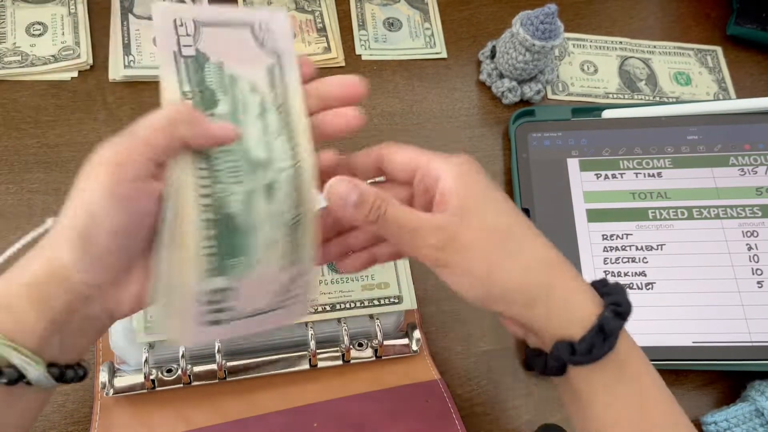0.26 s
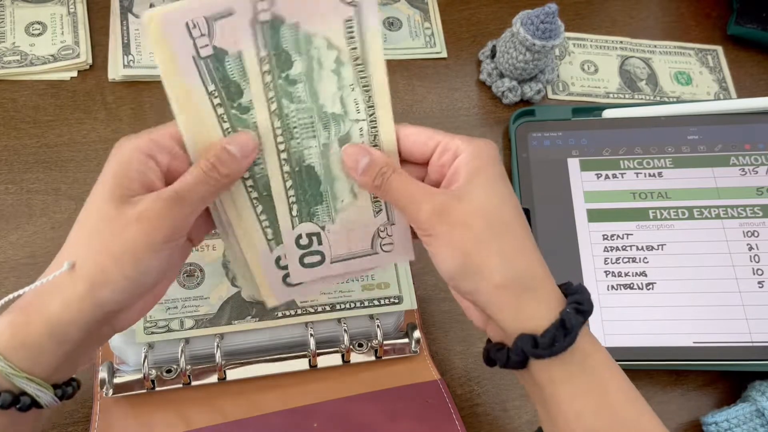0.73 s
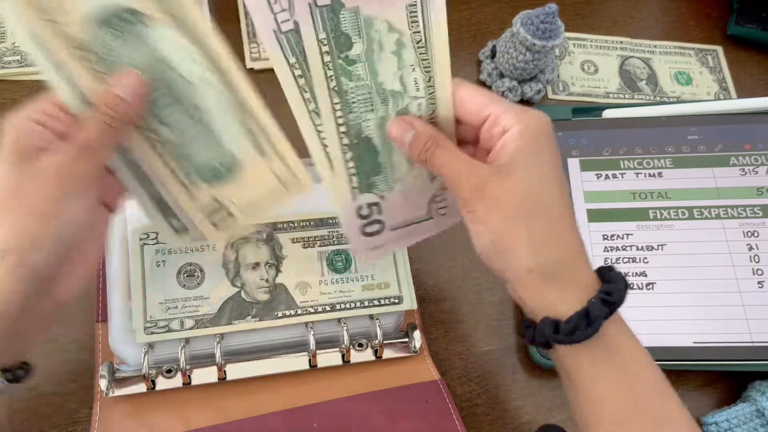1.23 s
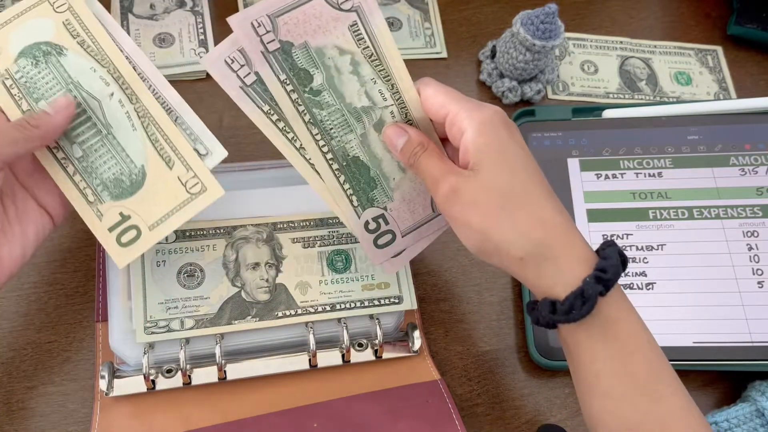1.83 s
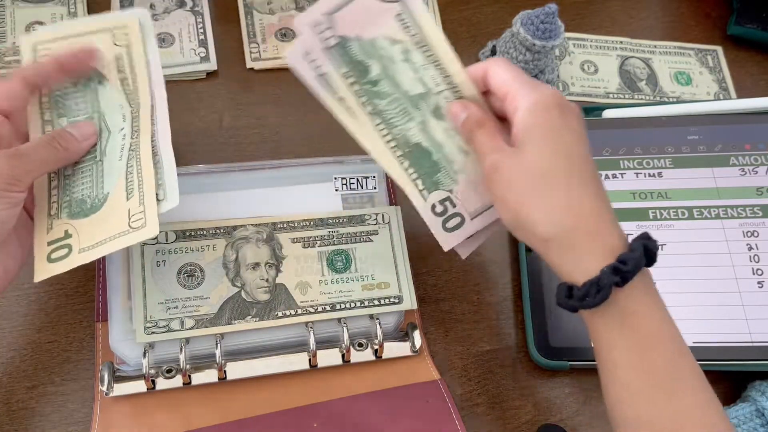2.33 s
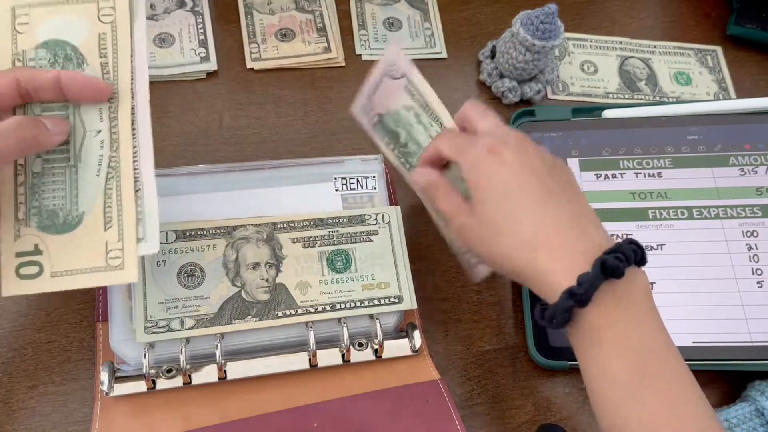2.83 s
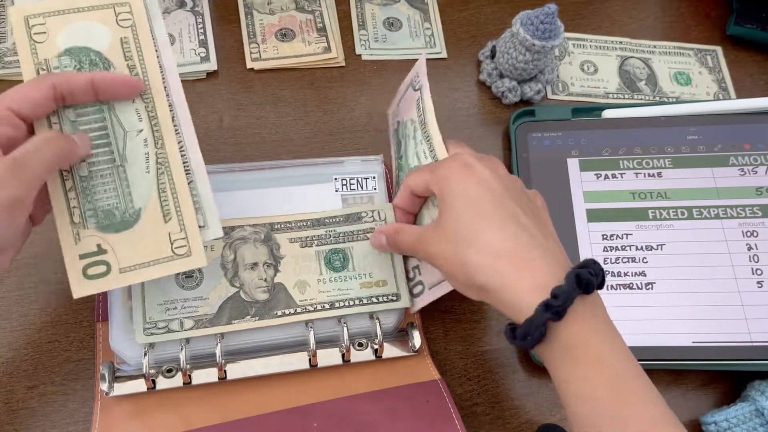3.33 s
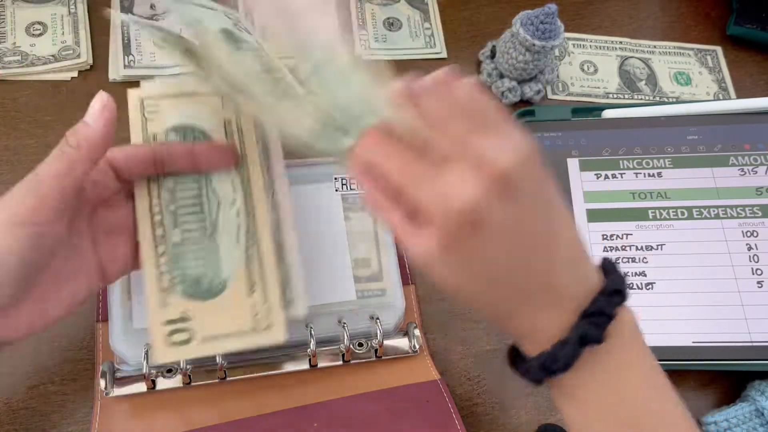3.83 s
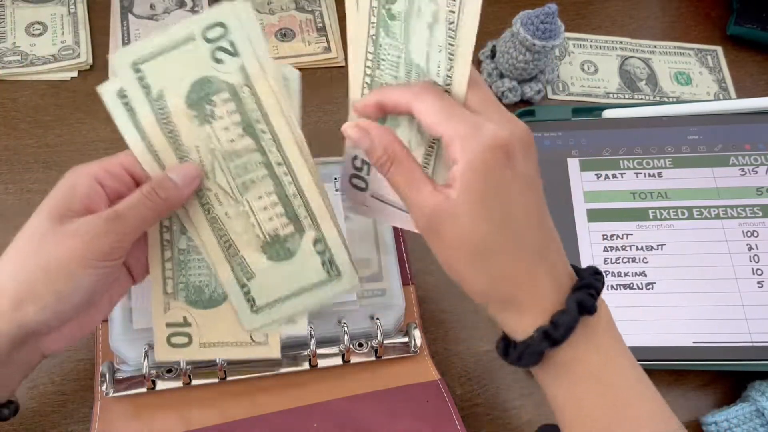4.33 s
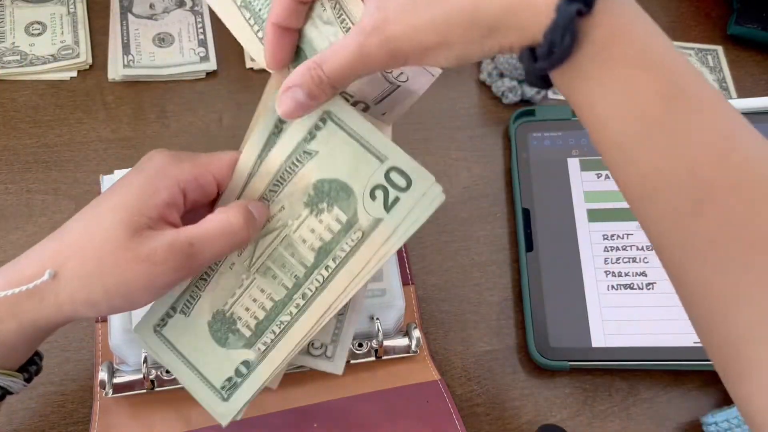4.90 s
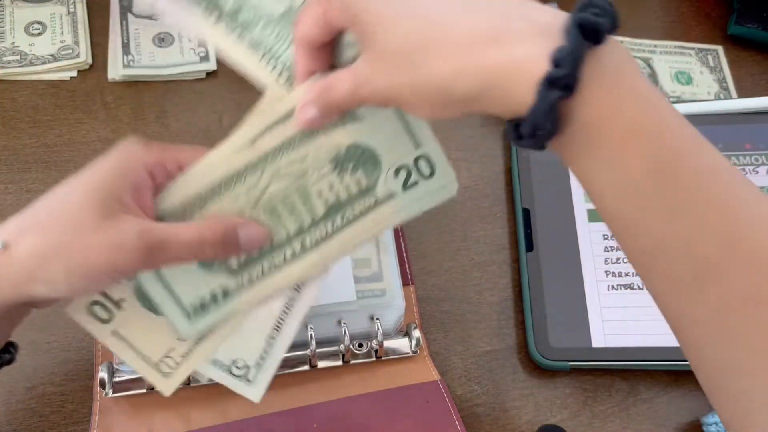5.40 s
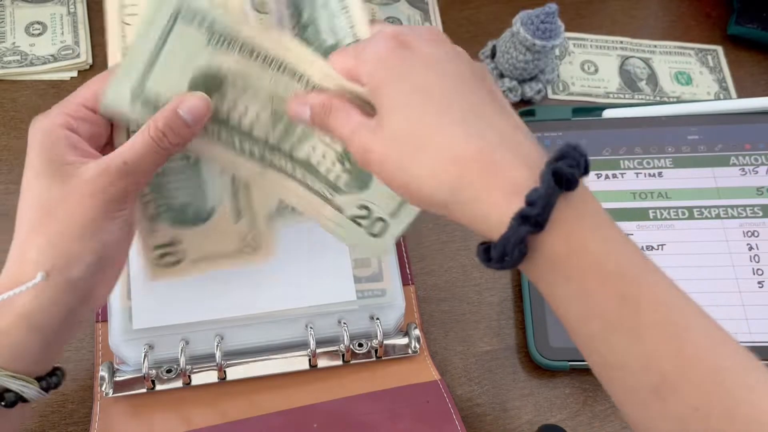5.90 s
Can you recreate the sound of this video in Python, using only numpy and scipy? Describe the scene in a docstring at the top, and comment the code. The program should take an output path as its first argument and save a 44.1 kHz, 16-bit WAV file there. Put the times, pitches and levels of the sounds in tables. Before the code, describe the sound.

Paper banknotes rustle, slide and snap softly as they are handled up close, over a steady low hum indoors.

```python
"""Banknotes over a desk

Hands fan, slide and flick paper banknotes close under the microphone, heard with a fixed stereo spread.
The sheets rub in tiny slips and buckle in short snaps; fingers now and then knock the desk.
Farther off in the room a compressor motor hums, its second order beating against the mains buzz."""
import sys
import numpy as np
from scipy import signal
from scipy.fft import rfft, irfft, next_fast_len
from scipy.io import wavfile
from scipy.ndimage import uniform_filter1d, map_coordinates

SR = 44100
rng = np.random.default_rng(int(sys.argv[2]) if len(sys.argv) > 2 else 0)


def file_out(sig):
    """Save sig as 16-bit WAV at sys.argv[1]."""
    # one column per channel
    cols = np.atleast_2d(sig).T
    # limit, then scale
    lim = np.clip(cols, -1, 1)
    pcm = np.round(lim * 32767).astype(np.int16)
    wavfile.write(sys.argv[1], SR, pcm)


N = 271195

# The paper's four bands: flap of the whole sheet, ring of the cupped stack, rub or crackle, fibre fizz
# (low edge [Hz], high edge [Hz], gain [dB])
PAPER_BANDS = [(334, 1470, -1), (1865, 2644, -1), (3140, 7100, 0), (7250, 20500, 2)]


def amp(db):
    """Decibels to gain."""
    return 10 ** (np.asarray(db) / 20)


def unit(x):
    """Scaled to rms 1."""
    return x / np.sqrt(np.mean(x ** 2) + 1e-20)


def along(points, hz):
    """Interpolate (frequency [Hz], value) points on a log frequency axis."""
    point_hz, values = np.transpose(points)
    return np.interp(np.log(hz + 1), np.log(point_hz + 1), values)


def wobble(rate):
    """A smooth random curve, rate knots a second."""
    knots = rng.standard_normal(int(N * rate / SR) + 4)
    return map_coordinates(knots, [np.arange(N) * rate / SR])


def filtered(x, response):
    """Filter x by a complex response, a function of frequency in Hz."""
    size = next_fast_len(N + SR // 2)
    return irfft(rfft(x, size) * response(np.fft.rfftfreq(size, 1 / SR)), size)[..., :N]


def room_tone():
    """The low rush of the room, wavering slightly in level."""
    # Spectrum of the room's noise (frequency [Hz], relative level [dB])
    spectrum = [(25, -19), (45, -2), (62, 5), (85, -4), (103, 1.5), (150, -9), (200, -8.5), (355, -10),
                (400, -15.5), (1000, -29.5), (2200, -37.5), (3500, -48), (8000, -61.5), (15000, -46.5)]
    rush = filtered(rng.standard_normal((2, N)), lambda hz: amp(along(spectrum, hz)))
    return amp(-48.5 + 1.5 * wobble(4.13)) * unit(rush)


def compressor_hum():
    """Shaft orders and mains buzz across the room, each a little unsteady; the first order swells."""
    # Upper orders of the motor (multiple of the shaft rate, level [dB])
    orders = [(2, -51), (3, -74.5), (4, -60.5), (5, -62.5)]
    # Mains buzz (multiple of the buzz frequency, level [dB])
    harmonics = [(1, -46.5), (2, -81.5), (3, -69)]
    shaft_hz, buzz_hz = 58.435, 119.943
    in_phase_s, rise_s = 0.258, 1.285
    t = np.arange(N) / SR

    def tone(hz, db, sway_db):
        rms = amp(db + sway_db * wobble(2.77))
        return np.sqrt(2) * rms * np.cos(2 * np.pi * hz * (t - in_phase_s))

    swell_db = -35 - 36 * np.exp(-t / rise_s)
    shaft = tone(shaft_hz, swell_db, sway_db=0.5)
    shaft += sum(tone(k * shaft_hz, db, sway_db=1.67) for k, db in orders)
    return shaft + sum(tone(k * buzz_hz, db, sway_db=1.0) for k, db in harmonics)


def sliding():
    """Power of the rubbing in each paper band: resting contact plus every stroke."""
    # Notes resting against each other in moving hands (time [s], rub [dB], flap [dB re rub])
    contact = [(0.0, -64.5, -19), (0.27, -64, -6), (0.47, -65, -3), (0.78, -65.5, -0.5), (0.96, -70, 1.5),
               (1.2, -68.5, 0.5), (1.35, -70.5, -2), (1.49, -79, -4), (1.6, -93, 25), (1.8, -79, 9),
               (2.0, -79.5, 2), (2.74, -87, 8), (2.83, -70.5, 15), (3.34, -72, 7.5), (3.5, -64, 2),
               (3.7, -71, -7), (3.82, -76, 12), (3.88, -76, 3), (4.13, -69.5, -11), (4.22, -102, 13),
               (4.3, -70.5, -20), (4.42, -70, -1), (4.79, -70, 7), (4.87, -63.5, 2), (5.42, -56.5, -9),
               (5.55, -63.5, 2.5), (5.85, -58, 3), (6.0, -64, -9)]
    # One sheet drawn across another (start [s], length [s], rub at the end [dB],
    # swell on the way [dB], flap [dB re rub], cup [dB re rub], fizz [dB re rub])
    strokes = [(0.114, 0.019, -51.5, 1.5, -3.5, -2, -10), (0.184, 0.027, -52.5, -4, -7.5, -11, -5),
               (0.316, .05, -56.5, 7.5, 5, -1.5, 2), (0.414, .022, -59.5, 0.1, -0.5, -14, 4),
               (0.507, 0.037, -60.5, 3.5, -19, -12, 1.5), (0.631, 0.022, -59.5, 0.1, 5, -3, 1),
               (0.76, 0.043, -65.5, 1, 1.5, -8, 3.5), (1.034, 0.079, -56.5, -1.8, -5, -7, 0.7),
               (1.122, 0.036, -61, -3.5, -7, -5, 4.5), (1.986, .07, -71.5, 4.5, 4, -1.5, 3),
               (2.161, 0.059, -65.5, 8, -3, 1.5, 1), (2.327, 0.18, -74.5, -6.5, 1, 0, 2.5),
               (2.595, 0.14, -76, -8, 3, -0.5, 0.5), (2.804, 0.028, -56.5, -1, 4, 0, -1),
               (2.952, 0.015, -58.5, 2, 3, 10.5, -3), (3.028, 0.054, -55.5, 4, -1, 3, -2),
               (3.155, 0.019, -61.5, -4, 3, 4, -1.5), (3.384, 0.089, -52.5, 5, 4, 2.5, -9),
               (3.613, 0.063, -55, 2.5, -6, -9, 2.5), (3.855, 0.049, -61.5, 4, -1.5, 1, 0.5),
               (3.946, 0.14, -55, 7.5, 0.9, -1.5, -4), (4.41, 0.096, -64, -1, 3, 6, 2.5),
               (4.542, 0.034, -55, 3, 1, 4.5, 1), (4.641, 0.032, -58.5, -0.5, 3, 4.5, -1.5),
               (4.737, 0.031, -56, 3.5, 1.2, 3.5, -15), (4.819, 0.039, -49, 0, -6, -0.5, -6),
               (4.865, 0.052, -49, 5, -4, -1, -7), (4.956, 0.022, -45.5, 5, 3.5, 0, -14),
               (5.013, 0.076, -50.5, -3, -8, -6, -13), (5.115, 0.2174, -42.5, 10.5, -2, 3, -5),
               (5.353, 0.052, -53, 4.5, 1.5, 2.5, 0), (5.493, 0.022, -51.5, 0.5, -9, -2, 0.1),
               (5.59, 0.198, -55, -1, -16, 1, -1), (5.82, .016, -51, 0.1, -2, -9, -3.5),
               (6.019, 0.017, -55, 2.5, 0, 5, 0), (6.078, .075, -54, -8, -4, -6, -0.5)]
    attack_db_per_s, release_db_per_s = 504, 804
    t = np.arange(N) / SR
    times, *levels = np.transpose(contact)
    rub_db, flap_db = [np.interp(t, times, column) for column in levels]
    power = amp([rub_db + flap_db, rub_db - 5, rub_db, rub_db - 1]) ** 2
    for start, length, end_db, swell_db, flap_db, cup_db, fizz_db in strokes:
        span = slice(max(0, round((start - .15) * SR)), round((start + length + .15) * SR))
        age = t[span] - start
        early, late = np.maximum(-age, 0), np.maximum(age - length, 0)
        to_go = np.clip(1 - age / length, 0, 1)
        level_db = end_db - swell_db * to_go - attack_db_per_s * early - release_db_per_s * late
        power[:, span] += amp(level_db + np.c_[[flap_db, cup_db, 0, fizz_db]]) ** 2
    return power


def slips(per_s, spread_db, life_s, steady):
    """Roughness of rubbing paper: a steady share plus random slips of very unequal size."""
    hits = rng.random(N) < per_s / SR
    sizes = hits * amp(spread_db * rng.exponential(1, N).clip(0, 4))
    bursts = signal.lfilter([1], [1, -np.exp(-1 / (life_s * SR))], sizes)
    return unit(steady + unit(bursts))


def bending_noise(depth_db):
    """Two noises whose colour drifts: the bending sheet favours now one pitch, now another."""
    spectra = signal.stft(rng.standard_normal((2, N + 256)), nperseg=256)[2]
    colour = uniform_filter1d(rng.standard_normal(spectra.shape[1:]), size=3, axis=0)  # over pitch
    colour = uniform_filter1d(colour, size=14, axis=1)  # over time
    noise = signal.istft(spectra * amp(depth_db * unit(colour)), nperseg=256)[1]
    return unit(noise[:, :N])


def snaps():
    """Creases buckle: noise power and an opening crack per band, and the ring of each freed fold."""
    # Buckling creases (time [s], level [dB], pitch of the fold [Hz], flap [dB re level],
    # crackle [dB re level], nominal t60 [s])
    creases = [(0.1221, -21, 4390, -16, -10, 0.0094), (0.138, -25.5, 7800, -13.5, -4.5, 0.0062),
               (0.1417, -32, 5600, -19, 1, 0.013), (0.1475, -25.5, 5270, -26, -2.5, 0.0076),
               (0.1841, -16, 7900, -20.5, -12.5, 0.018), (0.1895, -36, 2250, -5, -26, 0.029),
               (0.2018, -34.5, 5000, -30, 1, 0.014), (0.319, -47, 4700, -3, 0.5, 0.02),
               (0.426, -44.5, 2780, -8, -13, 0.031), (0.697, -47, 1110, 6.5, -15, 0.029),
               (1.062, -30.5, 2200, -0.5, -16.5, 0.02), (1.383, -55.5, 2400, -15, -5, .016),
               (2.0705, -58, 5000, -12, 0, .012), (2.116, -54.5, 900, -16, -2.5, .045),
               (2.398, -43, 2190, -6, -16, .014), (2.443, -48.5, 2190, -8, -10, .016),
               (2.7702, -25, 2530, -7.5, -12, 0.017), (2.7759, -35.5, 1560, 0, 0.5, 0.01),
               (2.802, -38, 3860, 1, -13, .054), (2.8176, -41.5, 1520, -7, -1, 0.025),
               (2.8679, -41, 1110, 4, -10, 0.03), (2.9475, -29, 2330, -3.5, -11.5, 0.015),
               (2.9577, -38.5, 1330, -5, -11, 0.042), (3.0684, -37, 2930, -9, -17, 0.042),
               (3.077, -43, 2740, -12, -12, 0.032), (3.1296, -27, 3030, -18, -16, 0.0035),
               (3.1528, -34.5, 1420, -5, -8, 0.03), (3.1593, -31.5, 1530, -6, -18, 0.014),
               (3.166, -42, 1300, -16, -7, 0.014), (3.256, -47, 3950, -13, -11.5, .023),
               (3.3587, -41.5, 1120, -2, -2.5, 0.022), (3.419, -32.5, 2570, -1, -12, .015),
               (3.446, -32, 1220, -17, -10, 0.027), (3.466, -32, 3600, -21, -12, 0.028),
               (3.779, -46, 3570, -23, -6, 0.011), (3.8449, -44.5, 4540, -7, -5.5, 0.12),
               (3.8546, -48, 900, -6, -5, 0.011), (3.993, -43.5, 2430, -6, -9, .024),
               (4.0375, -40.5, 4940, -11, -3, 0.021), (4.0682, -48, 6700, -17, -5, .09),
               (4.4049, -34, 2130, -5, -26, 0.032), (4.4176, -39, 1520, -17, -11, 0.0088),
               (4.465, -40, 2310, -8, -15.5, 0.045), (4.504, -45, 9150, -16, -8, .012),
               (4.5742, -37, 2080, -5, -14, 0.03), (4.5813, -37, 2220, -7.5, -12, 0.03),
               (4.63, -35.5, 1970, -16, -17, 0.029), (4.7252, -40.5, 3660, -4, -7, 0.007),
               (4.9448, -42.5, 2600, -12, -3, .012), (4.9562, -27.5, 6130, -10, -9, 0.057),
               (4.9646, -29.5, 2500, -9, -6, .073), (5.0073, -29, 2960, -15, -8.5, .095),
               (5.1118, -50, 2200, -16, -9, 0.076), (5.128, -29, 1910, -21, -10, .013),
               (5.1644, -30, 2340, -23, -24, .013), (5.1869, -46, 2500, -20, -19, .026),
               (5.202, -35, 2000, -19, -4.5, .014), (5.214, -31, 2340, -9, -5.5, 0.026),
               (5.2353, -26, 7500, -11, -4.5, 0.027), (5.3336, -44.5, 1930, 3, 1, 0.023),
               (5.5018, -39.5, 2210, -17, -6.5, 0.07), (5.569, -40, 7030, -18, -11, .038),
               (5.6412, -37.5, 2460, -26, -8.5, 0.025), (5.6538, -27.5, 11850, -32, -15, .017),
               (5.678, -32, 2260, -9, -9, 0.024), (5.772, -40, 3200, -7, -13, .036),
               (5.811, -35, 3100, -15, -6.5, 0.046), (5.864, -38, 1300, -2.5, -7, .013),
               (6.012, -44.5, 3000, -11, -7, .025), (6.0243, -38, 5100, -23, -1.5, 0.025),
               (6.066, -35.5, 2200, -12, -4.5, 0.021), (6.103, -35.5, 2710, -10, -5.5, 0.041),
               (6.1172, -25, 7950, -12, -12, 0.0075)]
    cup_hz, fold_t60_s = 2040, 0.025
    power, cracks = np.zeros((2, len(PAPER_BANDS), N + SR))
    folds = np.zeros(N + SR)
    t = np.arange(SR // 8) / SR
    for start, db, hz, flap_db, crackle_db, t60 in creases:
        onset = round(start * SR)
        span = slice(onset, onset + len(t))
        octaves = np.log2(hz / cup_hz)
        cup_db = 3.5 - 7.5 * abs(octaves)  # a fold near the cupped stack's pitch rings it most
        fizz_db = -5 + 3.5 * octaves  # a higher fold fizzes more
        shares = amp([flap_db, crackle_db + cup_db, crackle_db, crackle_db + fizz_db])
        attack = 1 - np.exp(-t / (0.016 * t60))  # a slow buckle starts softly
        envelope = attack * amp(db - 60 * t / np.clip(t60, .003, .1))
        power[:, span] += (shares[:, None] * envelope) ** 2
        cracks[:, onset] = shares * amp(db - 5.5) * min(1, 0.0087 / t60)  # a quick one jerks sharply
        folds[span] += envelope * amp(-60 * t / fold_t60_s) * np.sin(2 * np.pi * hz * t)
    return power[:, :N], cracks[:, :N], folds[:N]


def banknotes():
    """Rubbing and snaps shake the same sheets; being unrelated motions, they add in power."""
    flicker = amp(1.32 * np.array([wobble(30) for _ in PAPER_BANDS]))
    roughness = slips(per_s=200, spread_db=4.5, life_s=0.0037, steady=3.0) * flicker
    snap_power, cracks, folds = snaps()
    powers = sliding() * roughness ** 2 + snap_power
    noise = bending_noise(depth_db=3)
    sound = folds * [[1], [.5]]
    for (low_hz, high_hz, db), power, crack in zip(PAPER_BANDS, powers, cracks):
        band = signal.butter(3, [low_hz, min(high_hz, SR / 2.2)], "bandpass", fs=SR, output="sos")
        makeup = np.sqrt(SR / 2 / (high_hz - low_hz))  # for what the band leaves out
        sound += amp(db) * makeup * signal.sosfilt(band, noise * np.sqrt(power) + makeup * crack)
    return sound


def desk_knocks():
    """Soft fingertips set the desk top ringing for a moment, a little differently each time."""
    # Fingers landing on the desk (time [s], strength [dB])
    knocks = [(0.182, -37), (0.701, -41.5), (1.309, -30), (1.329, -41), (2.821, -36.5), (4.96, -36.5)]
    # Modes of the desk top (frequency [Hz], relative level [dB], t60 [s])
    modes = [(53.5, -1.5, 0.21), (191, -1.5, 0.061), (249, 3.5, 0.079), (403, 0.5, 0.037), (493, -27, 0.03),
             (820, -10.5, 0.025)]
    desk = np.zeros(N + SR)
    t = np.arange(SR // 4) / SR
    attack = 1 - np.exp(-t / 0.00074)
    for start, db in knocks:
        ring = sum(amp(mode_db + rng.normal(0, 2) - 60 * t / t60) * np.sin(2 * np.pi * hz * t)
                   for hz, mode_db, t60 in modes)
        desk[round(start * SR):][:len(t)] += amp(db - 4) * ring * attack
    return desk[:N]


def room_reverb(x):
    """The room's short tail; each frequency dies at its own speed."""
    # Decay of the room (frequency [Hz], t60 [s])
    decay = [(300, 0.14), (2000, 0.19), (10000, 0.053)]
    hz, t, spectra = signal.stft(rng.standard_normal((2, SR // 3)), SR, nperseg=256)
    fade = amp(-60 * t / along(decay, hz)[:, None])
    tail = signal.istft(spectra * fade, SR, nperseg=256)[1]
    return signal.fftconvolve(x, tail / np.linalg.norm(tail[0]), axes=1)[:, :N]


def stereo_widener(pair):
    """Mid and side get a fixed stereo spread: left-right phase, balance and likeness by frequency."""
    # Stereo spread (frequency [Hz], phase lead of left [rad], left over right [dB], likeness [0-1])
    spread = [(0, 0, 0, 1), (60, .06, 0, .98), (130, .2, .6, .93), (170, 0, .5, .93), (230, .4, 6, .8),
              (340, .3, 0, .75), (430, .3, 2, .25), (1000, .1, 4, .45), (1450, 1, 3, .2),
              (1620, 2.6, 1, .6), (1760, 0, 0, .97), (2500, 1.2, 3, .87), (3400, 1.6, 5, .5),
              (4200, .4, 4, .65), (5000, 0, 5, .8), (6300, -1.1, 3, .88), (7500, -2.3, 1, .92),
              (8100, -3.14, 0, 1), (8600, -3.14, 0, 1), (10000, -4.7, 0, .82), (11400, -6.28, 0, 1),
              (12400, -6.28, 0, 1), (13500, -7.8, 0, .65), (15000, -9.3, 0, .97), (15400, -9.42, 0, 1)]
    spread_hz, lead, balance_db, likeness = np.transpose(spread)

    def width(hz):
        angle = np.arccos(np.clip(np.interp(hz, spread_hz, likeness), 0, 1)) / 2
        return np.array([np.cos(angle), np.sin(angle)])

    def placement(hz):
        gain = amp(np.interp(hz, spread_hz, balance_db) / 2)
        left = gain * np.exp(.5j * np.interp(hz, spread_hz, lead))
        return np.array([left, 1 / left])

    mid, side = filtered(pair, width)
    return filtered(np.array([mid + side, mid - side]), placement)


def scene():
    """Notes and desk close to the microphone, motor and room farther off, mixed as mid and side."""
    close = banknotes() + desk_knocks() * [[1], [.4]]
    far = amp(-14.5) * room_reverb(close) + room_tone() + compressor_hum() * [[1], [0]]
    return stereo_widener(close + far)


def record(dry):
    """The microphone colours the treble; nothing is kept above the band limit."""
    # Treble response of the microphone (frequency [Hz], gain [dB])
    treble = [(6000, 0), (9500, 2.5), (11800, 0), (13000, -1.5), (15700, -6)]
    limit_hz = 15750
    return filtered(dry, lambda hz: amp(along(treble, hz)) * (hz < limit_hz))


dry = scene()
out = record(dry)
file_out(out)
```